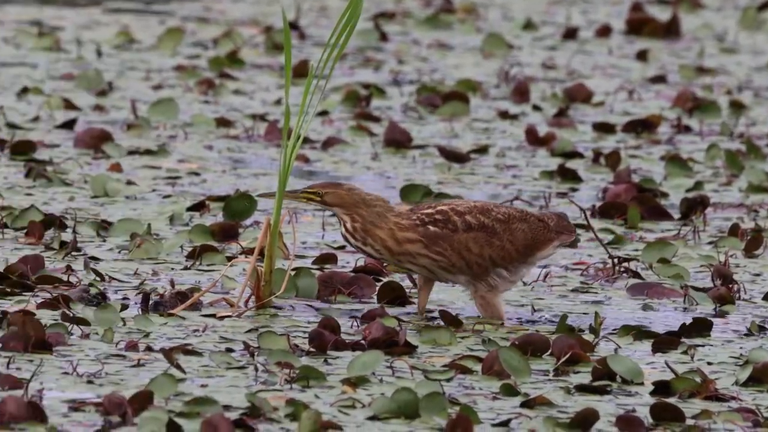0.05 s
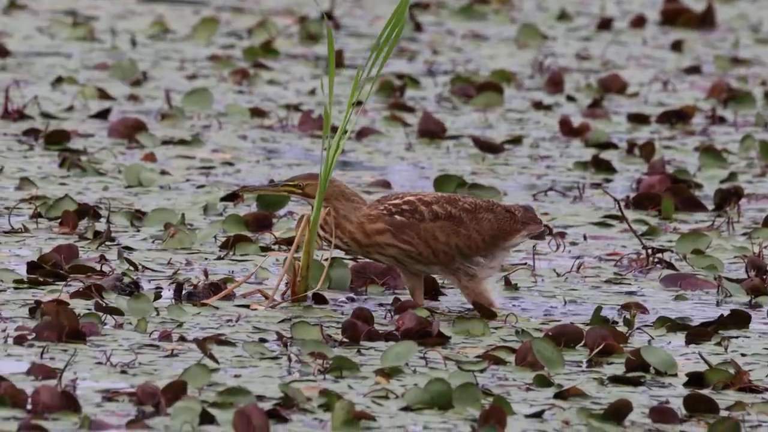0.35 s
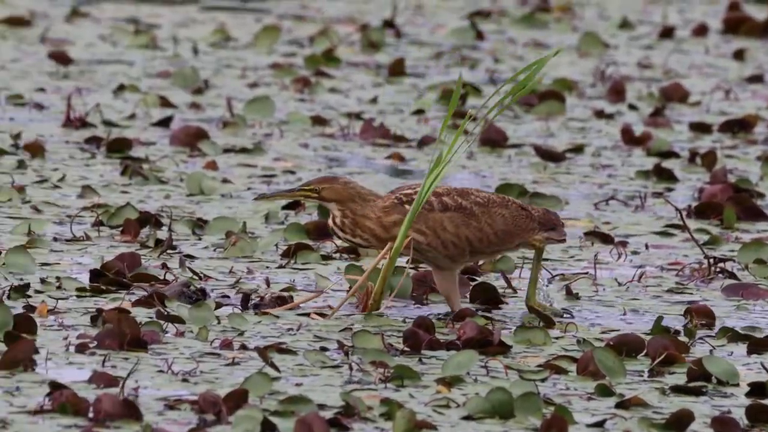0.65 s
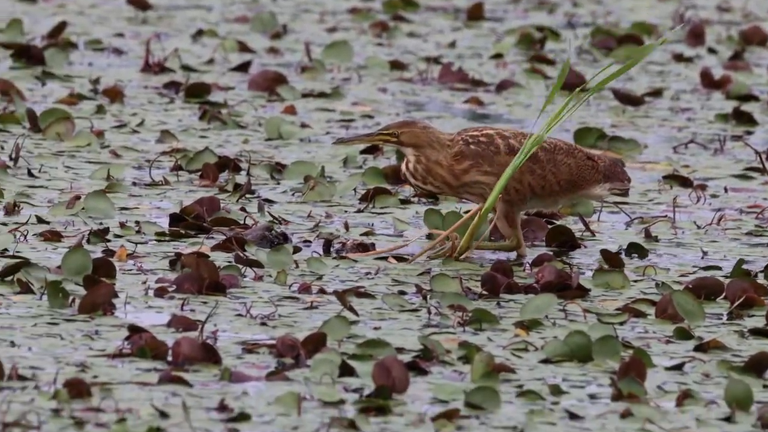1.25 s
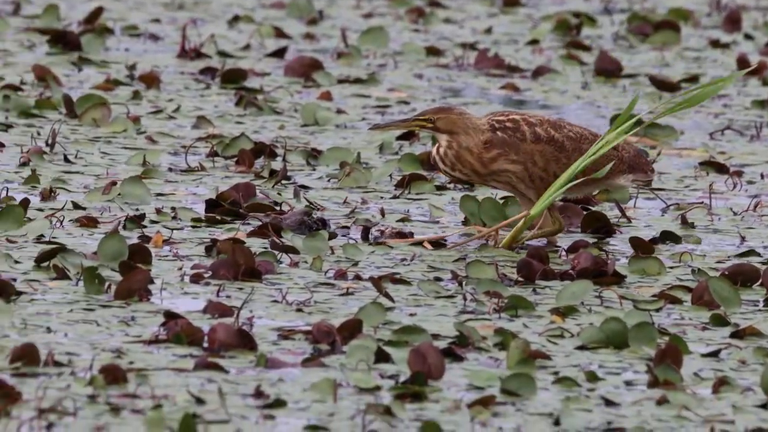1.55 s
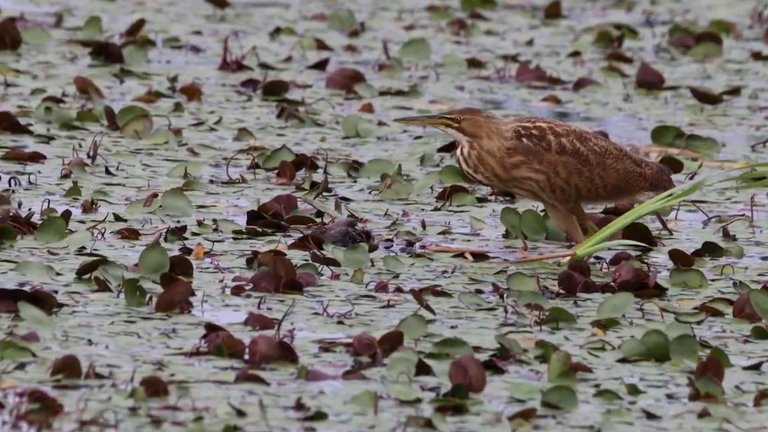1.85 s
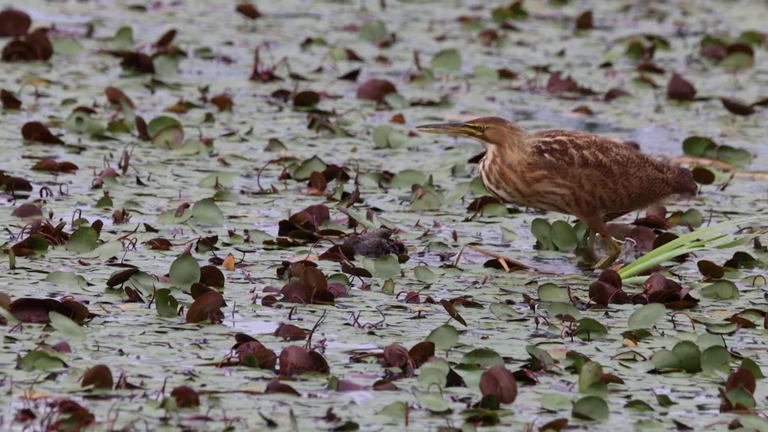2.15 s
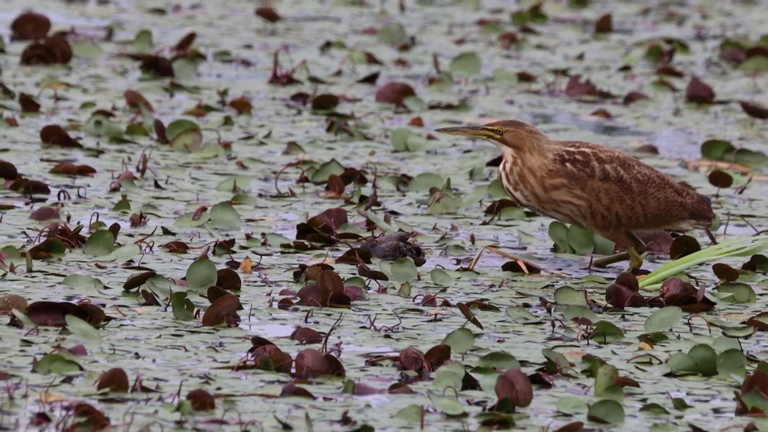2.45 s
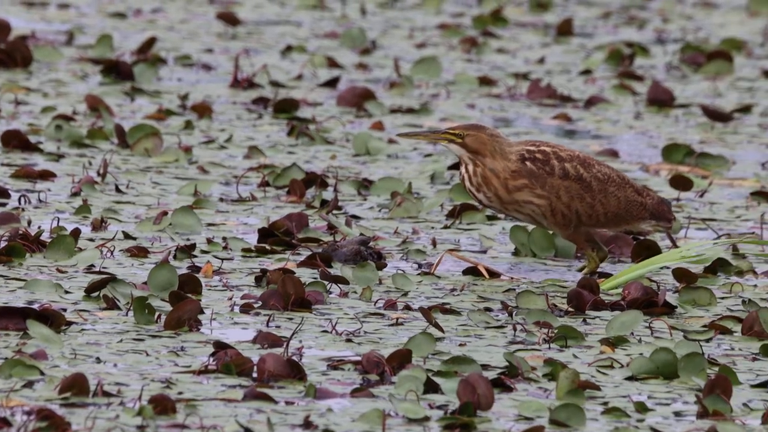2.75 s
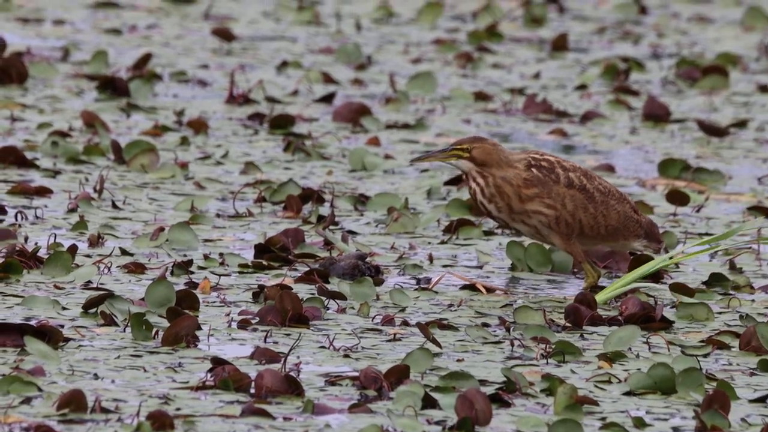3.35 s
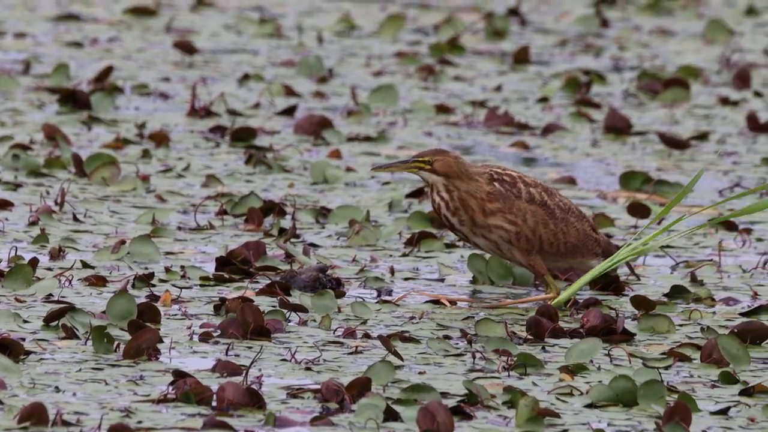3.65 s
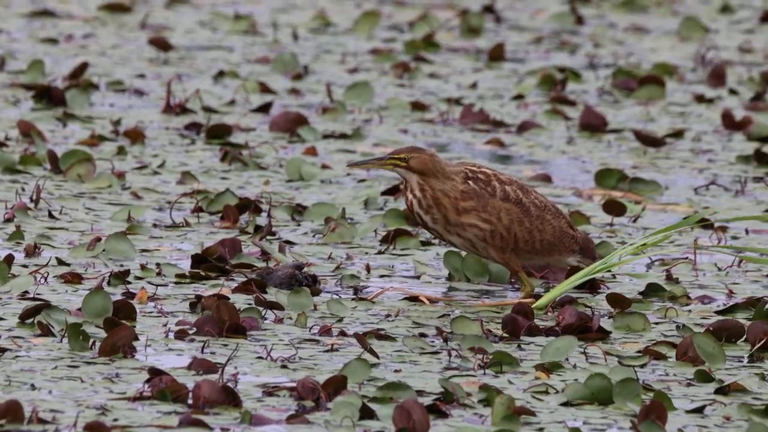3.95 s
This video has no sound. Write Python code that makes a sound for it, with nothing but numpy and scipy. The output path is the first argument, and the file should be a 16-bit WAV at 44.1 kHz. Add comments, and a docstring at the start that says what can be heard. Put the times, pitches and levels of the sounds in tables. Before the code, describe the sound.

A frog croaks twice, close and slightly right: a short, dry, hollow rattle at about 2 seconds and a briefer one at 3.8. Distant traffic and wind rumble throughout, swelling slightly around 1 second, with a few low gusts on the microphone. Faint wet ticks come between 2.4 and 3 seconds, a thin hiss creeps in, and a soft rustle of pond plants grows from 3.3 seconds.

```python
"""Croaks beside a pond

Two short, dry, frog-like croaks, close by and a little to the right. Each is a rattle of
about 30 pulses a second; a pulse is two hollow knocks joined by a rasp. Distant traffic
and wind rumble behind; faint ticks, a soft rustle and a thin fizz come up late."""
import sys
import numpy as np
from scipy import signal
from scipy.fft import rfft, irfft
from scipy.io import wavfile
from scipy.ndimage import uniform_filter1d

SR = 44100
rng = np.random.default_rng(int(sys.argv[2]) if len(sys.argv) > 2 else 0)


def to_wav(s):
    """Save 16-bit WAV."""
    ch = np.atleast_2d(s).T  # columns
    pcm = np.round(np.clip(ch, -1, 1) * 32767)  # PCM
    wavfile.write(sys.argv[1], SR, pcm.astype(np.int16))


N = 176400

# Bed of far traffic and wind, one spectrum per ear: freq_hz, density_db
AIR_LEFT_COLOUR = [(20, -28), (35, -14), (50, -8), (70, -5), (95, -4.5), (130, -1), (220, 2), (330, -2),
                   (430, -3), (550, -7.5), (800, -5.5), (1100, -7.5), (1400, -14), (1800, -19), (2200, -21),
                   (2800, -28), (4500, -31.5), (8000, -36), (11500, -36.5), (15500, -50)]
AIR_RIGHT_COLOUR = [(20, -39), (35, -25), (50, -17), (70, -15.5), (95, -3.5), (130, -1.5), (220, 0.5),
                    (330, -1), (430, -6), (550, -10.5), (850, -4), (1100, -4.5), (1350, -10), (2000, -9.5),
                    (2350, -18), (2800, -28), (4800, -32.5), (8300, -37), (11700, -34.5), (15500, -40.5)]
# How alike the ears hear the bed (1 is mono): freq_hz, correlation
AIR_CORRELATION = [(60, 0.94), (110, 0.95), (200, 0.94), (380, 0.88), (700, 0.45), (1290, -0.15),
                   (2380, -0.43), (4400, -0.039), (8120, -0.041), (15000, -0.08)]
# Low gusts on the microphone: centre_s, half_width_s, level_db
GUST_SWELLS = [(1.088, .02, -52), (2.833, .025, -45), (3.3, 0.11, -53), (3.98, 0.042, -54)]
# Their boom: freq_hz, density_db
GUST_SPECTRUM = [(15, -18), (35, -24), (55, 10), (75, -7), (110, -32), (300, -50), (2000, -90)]
# A far vehicle passing: time_s, level_db
VEHICLE_LEVEL = [(0, -54.5), (.55, -50), (.95, -46.5), (1.4, -48), (2.0, -55), (4.0, -54)]
# Its rumble: freq_hz, density_db
VEHICLE_COLOUR = [(40, -37), (80, -1), (110, -0.5), (220, -1), (330, -2.5), (500, -21.5), (1500, -35),
                  (5000, -74)]
# Thin hiss on the left: time_s, level_db
HISS_LEVEL = [(0, -76), (1.9, -73), (2.2, -67.5), (2.9, -63.5), (4.0, -64)]
# Airy top shared by hiss, crackles and brushes: freq_hz, density_db
FIZZ_COLOUR = [(200, -30), (5000, -6), (9000, -3), (11500, 3), (14000, -5), (16000, -17)]
# Light brushing sounds: centre_s, half_width_s, left_db, right_db
BRUSH_STROKES = [(.975, .015, -64, -59.5), (1.132, 0.026, -65, -55.5), (1.298, .003, -55, -59),
                 (1.593, .015, -59, -67), (3.46, 0.055, -56.5, -62)]
# Swell of the rustle: time_s, level_db
RUSTLE_SWELL = [(0, -83), (1.9, -68), (2.2, -65), (3.33, -60.5), (3.35, -53), (3.62, -49), (3.72, -50),
                (3.86, -46.5), (4.0, -55)]
# Its papery tone: freq_hz, density_db
RUSTLE_COLOUR = [(200, -17), (1000, 0), (1450, 6), (1750, 3), (2150, 6), (2500, 3), (2950, -3), (3700, -3),
                 (4400, -6.5), (5200, -5.5), (5900, -13.5), (8000, -14), (11000, -15.5), (15500, -34)]
# Faint wet ticks: start_s, gain_db, pitch_hz
WET_TICKS = [(2.407, -54, 3130), (2.558, -52.5, 2900), (2.585, -54, 3600), (2.622, -55, 3000),
             (2.699, -52, 2730), (2.848, -49, 2090), (2.945, -48, 3200), (3.005, -48, 3060),
             (3.030, -53, 2900)]
# The spit of noise in a tick: freq_hz, density_db
SPIT_COLOUR = [(200, -25), (1500, -14), (2400, 11), (3200, -2), (4500, -8), (7000, -21), (12000, -6),
               (16000, -25)]
# Body resonances that a knock leaves ringing: pitch_hz, left_db, right_db, t60_s
BODY_MODES = [(601, -17, -16.5, 0.061), (675, -33, -13, 0.062), (744, -25, -38, 0.026),
              (936, -12, -31, .034), (1105, -29, -6, 0.024), (1365, -2, -29, 0.014),
              (1867, -26, -16, 0.021), (2200, -31, -2.5, 0.0079)]
# The rasp between knocks: freq_hz, density_db
RASP_COLOUR = [(100, -20), (400, 5), (900, -2.5), (1400, -7.5), (2300, 3), (2900, -8.5), (3500, -10.5),
               (4800, -6), (5800, -7.5), (6800, -14), (8500, -20.5), (11500, -15), (15500, -36)]
# Croak pulses, with rasp levels relative to RASP_DB:
# start_s, first_knock_db, first_hz, gap_s, second_knock_db, second_hz, first_rasp_db, second_rasp_db
CROAK_PULSES = [(1.9692, -15, 860, 0.0078, -12.5, 750, 0, 8), (2.0020, -12, 860, 0.0044, -15, 740, 0.5, 0),
                (2.0349, -16.4, 890, .0059, -13.3, 796, 0, -11),
                (2.0688, -16.5, 950, 0.00369, -17, 770, 3.5, -10),
                (2.102, -13.5, 795, 0.00252, -21, 570, 1, -9), (3.8378, -17, 820, 0.00597, -7, 803, 3, -6),
                (3.8709, -17.5, 855, 0.00388, -11, 810, 1, -3),
                (3.9048, -18.5, 910, 0.0048, -10.5, 789, 0, -4)]

HUM_HZ, HUM_WIDTH_HZ, HUM_START_DB, HUM_DB_PER_S = 66.9, 4.1, -62, 1.5
CRACKLES_PER_S, CRACKLE_BASE_DB, CRACKLE_SPREAD_DB, CRACKLE_FALL_S = 22, -63, 1.5, .004
TICK_FALL_S, TICK_PING_DB, TICK_SPIT_DB = .0064, -3, 2
KNOCK_PEAK_S, KNOCK_SHAPE, BODY_RISE_S = .0013, 1.67, .0022
KNOCK_LEFT_DB, LEFT_LAG_S = -6, .00008
ECHO_S, ECHO_LEFT_DB, ECHO_RIGHT_DB = .0055, -10.5, -11
RASP_DB, RASP_LEFT_DB, RASP_GRAIN = -31, -3.5, .28
RASP_LEAD_S, RASP_RISE_S, RASP_SAG_S, RASP_FALL_S = .0007, .0016, .012, .0035
TAIL_DB, TAIL_T60_S = -22, .17
CROAK_LOW_CUT_HZ, HIGH_CUT_HZ = 383, 15650


def amp(db):
    """Decibels to gain."""
    return 10 ** (np.asarray(db) / 20)


def unit(x):
    """Scales to rms 1."""
    return x / np.sqrt(np.mean(x ** 2) + 1e-20)


def curve(points):
    """A table's value at every FFT bin, drawn on a log-frequency axis."""
    hz, value = np.transpose(points)
    return np.interp(np.log(np.fft.rfftfreq(N, 1 / SR) + 1), np.log(hz + 1), value)


def fader(points):
    """A gain ride through (time_s, level_db) points."""
    return amp(np.interp(np.arange(N) / SR, *np.transpose(points)))


def add(mix, start_s, sound):
    """Lays a sound into the mix."""
    part = mix[:, max(round(start_s * SR), 0):][:, :sound.shape[1]]
    part += sound[:, :part.shape[1]]


def colour(x, points):
    """Gives steady noise a spectrum, at rms 1."""
    return unit(irfft(rfft(x) * amp(curve(points)), N))


def noise(points, channels=2):
    """Coloured noise, independent in each channel."""
    return colour(rng.standard_normal((channels, N)), points)


def air():
    """Steady far traffic and wind, nearly mono in the bass; a far engine hums, slowly nearing."""
    hz = np.fft.rfftfreq(N, 1 / SR)
    shared, apart, engine = rfft(rng.standard_normal((3, N)))
    alike = curve(AIR_CORRELATION)
    left = colour(irfft(shared, N), AIR_LEFT_COLOUR)
    right = colour(irfft(alike * shared + np.sqrt(1 - alike ** 2) * apart, N), AIR_RIGHT_COLOUR)
    hum = unit(irfft(engine / (1 + (2 * (hz - HUM_HZ) / HUM_WIDTH_HZ) ** 2), N))  # narrow noise wavers
    hum_gain = amp(HUM_START_DB + HUM_DB_PER_S * np.arange(N) / SR)
    return np.array([amp(-42.5) * left, amp(-40) * right]) + hum_gain * hum


def rumble():
    """A far vehicle swells and fades; a few low gusts bump the microphone."""
    t = np.arange(N) / SR
    swells = sum(amp(db) * np.exp(-((t - s) / half) ** 2) for s, half, db in GUST_SWELLS)
    gusts = swells * noise(GUST_SPECTRUM, channels=1)
    return gusts + fader(VEHICLE_LEVEL) * noise(VEHICLE_COLOUR, channels=1)


def fizz():
    """Tiny high crackles split between the ears, and a thin hiss that grows on the left."""
    hits = rng.random((2, N)) < CRACKLES_PER_S / SR / 2
    accents = amp(CRACKLE_SPREAD_DB * np.minimum(rng.exponential(1, (2, N)), 3))
    decay = np.exp(-1 / (CRACKLE_FALL_S * SR))
    crackle = amp(CRACKLE_BASE_DB) * signal.lfilter([1], [1, -decay], hits * accents)
    hiss = np.array([fader(HISS_LEVEL), np.zeros(N)])
    return np.hypot(crackle, hiss) * noise(FIZZ_COLOUR)


def rustle():
    """A soft rustle that grows near the end, and a few high brushing sounds."""
    t = np.arange(N) / SR
    brushes = sum(amp([[left], [right]]) * np.exp(-((t - s) / half) ** 2)
                  for s, half, left, right in BRUSH_STROKES)
    return fader(RUSTLE_SWELL) * noise(RUSTLE_COLOUR) + brushes * noise(FIZZ_COLOUR)


def ticks():
    """Faint wet ticks: a spit of noise and a short ping."""
    t, out = np.arange(N) / SR, np.zeros((2, N))
    spit = amp(TICK_SPIT_DB) * noise(SPIT_COLOUR)
    for start_s, db, hz in WET_TICKS:
        ping = amp(TICK_PING_DB) * np.sin(2 * np.pi * (hz * t + rng.random((2, 1))))
        envelope = (t > start_s) * np.exp(-abs(t - start_s) / TICK_FALL_S)
        out += amp(db) * envelope * (spit + ping)
    return out


def open_air_tail(voice):
    """Scattered sound: a very short outdoor reverb, wet only."""
    t = np.arange(SR // 5) / SR
    tail = rng.standard_normal((2, len(t))) * np.exp(-np.log(1000) * t / TAIL_T60_S) * (t > ECHO_S)
    return amp(TAIL_DB) * signal.fftconvolve(voice, tail / np.linalg.norm(tail[0]), axes=1)[:, :N]


def burst(t, hz):
    """The attack of a knock: a tone that swells and dies in a few cycles."""
    t = np.maximum(t, 0)
    age = t / KNOCK_PEAK_S
    return (age * np.exp(1 - age)) ** KNOCK_SHAPE * -np.sin(2 * np.pi * hz * t)


def knock(hz):
    """One hollow knock, its slap off a nearby surface and the ringing of the body."""
    t = np.arange(SR // 10) / SR
    direct = np.array([amp(KNOCK_LEFT_DB) * burst(t - LEFT_LAG_S, hz), burst(t, hz)])
    echo = amp([[ECHO_LEFT_DB], [ECHO_RIGHT_DB]]) * burst(t - ECHO_S, hz)
    swell = 1 - np.exp(-(t / BODY_RISE_S) ** 2)
    ring = sum(amp([[left], [right]]) * np.exp(-np.log(1000) * t / t60) * np.sin(2 * np.pi * f * t)
               for f, left, right, t60 in BODY_MODES)
    return direct + echo - swell * ring


def croaks():
    """Each pulse knocks, rasps for a few milliseconds and knocks again."""
    t = np.arange(SR // 10) / SR
    knocks, rasp_envelope = np.zeros((2, N)), np.zeros((1, N))
    rise = 1 - np.exp(-(t / RASP_RISE_S) ** 2)
    for start_s, first_db, first_hz, gap_s, second_db, second_hz, rasp1_db, rasp2_db in CROAK_PULSES:
        add(knocks, start_s, amp(first_db) * knock(first_hz))
        add(knocks, start_s + gap_s, amp(second_db) * knock(second_hz))
        # The rasp leads each knock slightly, sags across the gap, then dies quickly.
        held = amp(rasp1_db) * rise * np.exp(-t / RASP_SAG_S - np.maximum(t - gap_s, 0) / RASP_FALL_S)
        release = amp(rasp2_db) * rise * np.exp(-t / RASP_FALL_S)
        add(rasp_envelope, start_s - RASP_LEAD_S, held[None])
        add(rasp_envelope, start_s + gap_s - RASP_LEAD_S, release[None])
    flutter = unit(uniform_filter1d(rng.standard_normal(N), size=36))
    grain = unit(np.exp(RASP_GRAIN * flutter))
    rasp = amp(RASP_DB) * amp([[RASP_LEFT_DB], [0]]) * rasp_envelope * grain * noise(RASP_COLOUR)
    low_cut = signal.butter(4, CROAK_LOW_CUT_HZ, "high", fs=SR, output="sos")
    return signal.sosfiltfilt(low_cut, knocks + rasp)


def scene():
    """The croaks up front, over the pond's ambience."""
    voice = croaks()
    return voice + open_air_tail(voice) + air() + rumble() + rustle() + ticks() + fizz()


def record(dry):
    """A steep high cut on the whole mix."""
    high_cut = signal.firwin(511, HIGH_CUT_HZ, window=("kaiser", 9), fs=SR)
    return signal.oaconvolve(dry, high_cut[None], "same", axes=1)


dry = scene()
out = record(dry)
to_wav(out)
```